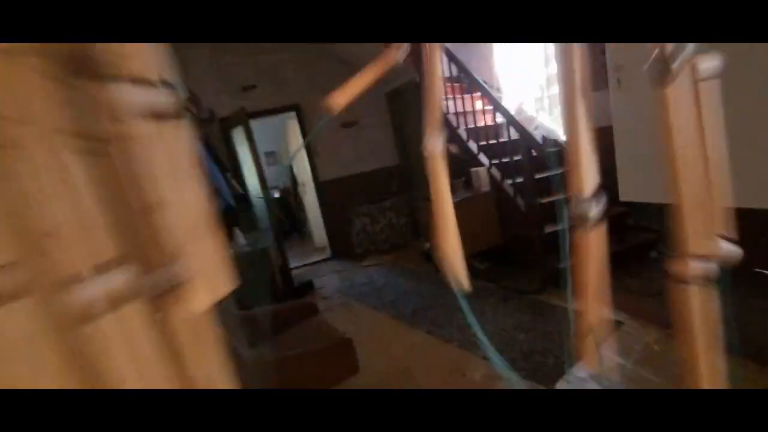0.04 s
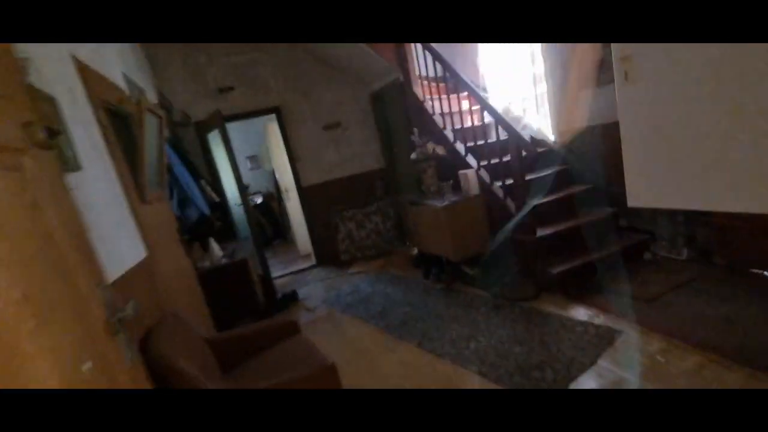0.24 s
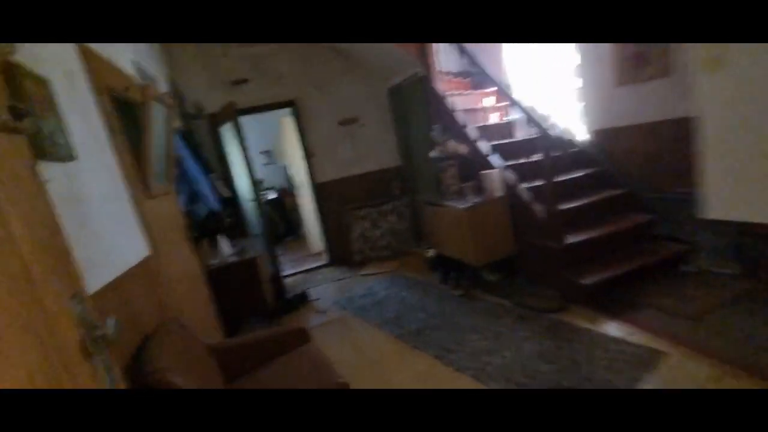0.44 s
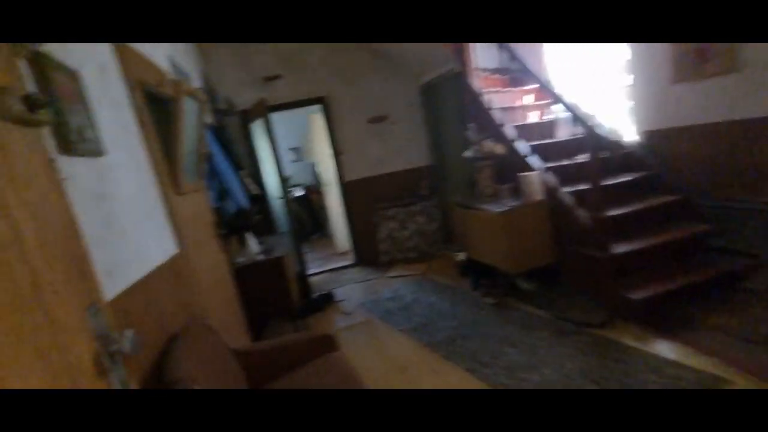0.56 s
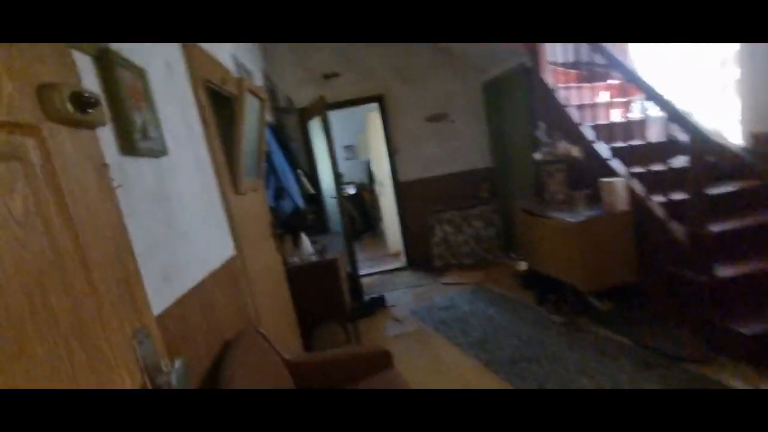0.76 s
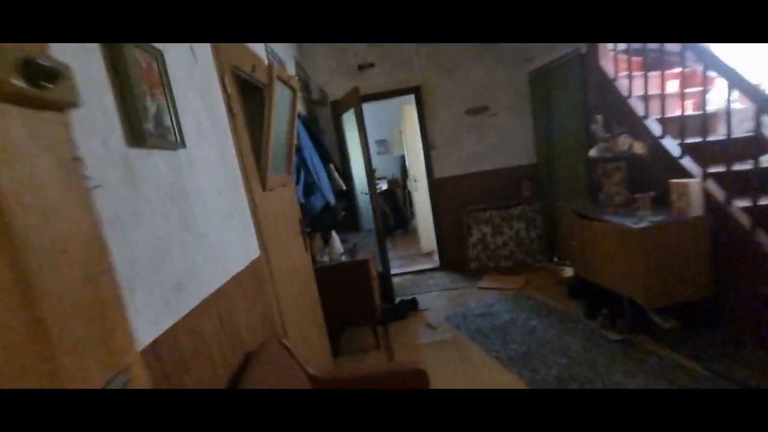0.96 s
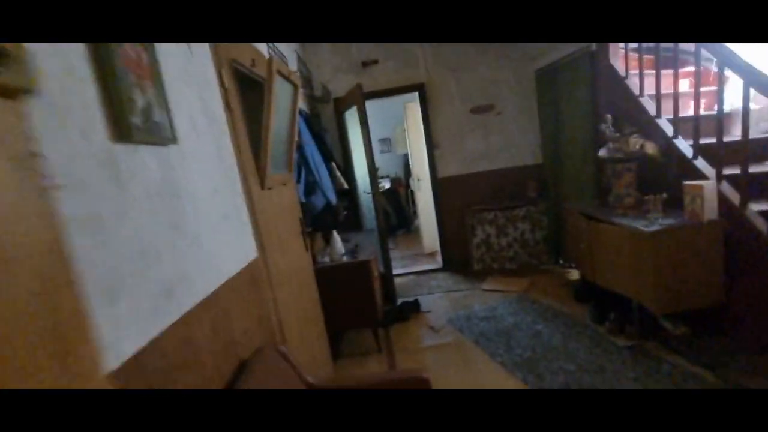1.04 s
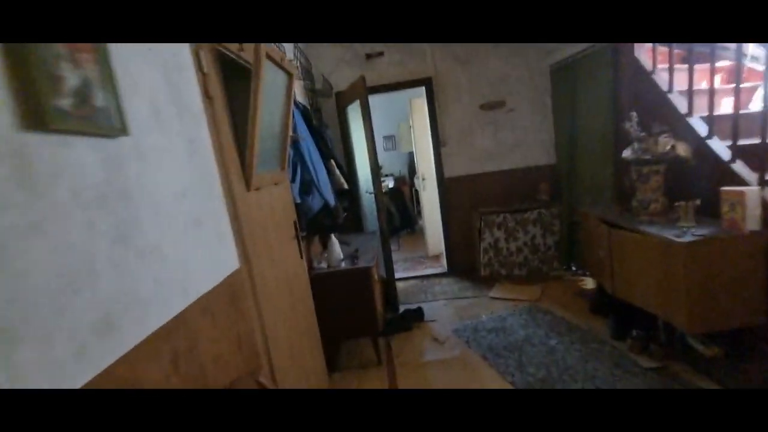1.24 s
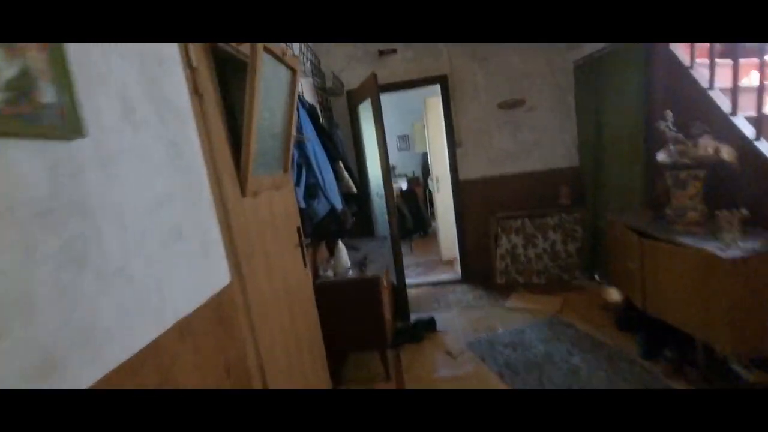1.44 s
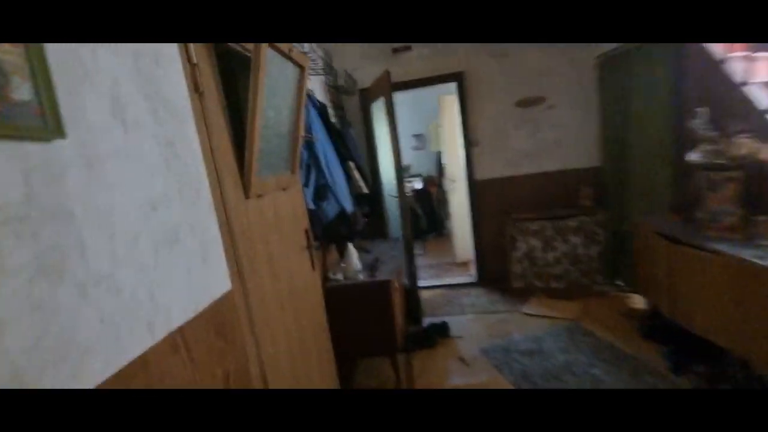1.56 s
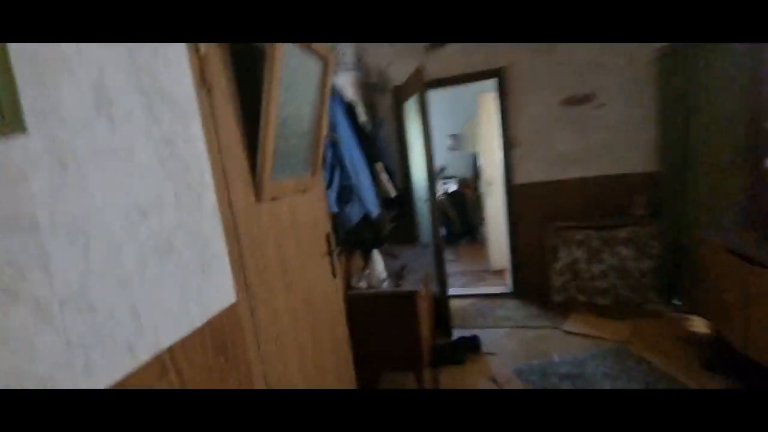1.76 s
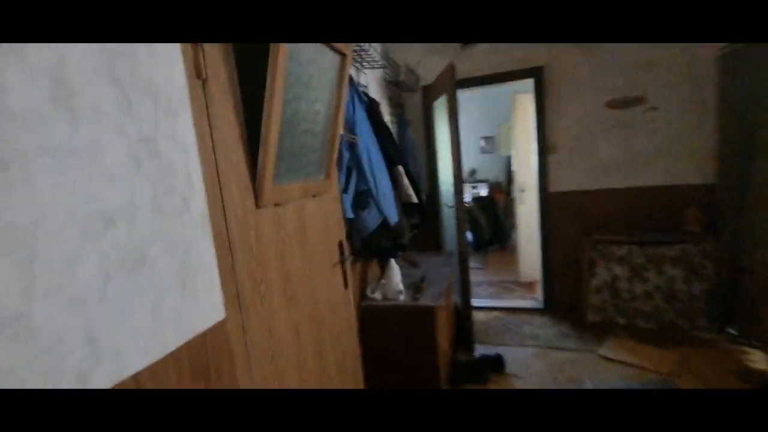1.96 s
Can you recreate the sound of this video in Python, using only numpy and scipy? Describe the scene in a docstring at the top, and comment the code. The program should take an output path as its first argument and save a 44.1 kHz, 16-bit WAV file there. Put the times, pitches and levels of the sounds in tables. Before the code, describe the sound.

Strands of wooden beads bump right on the microphone, close and dry, before ticking and rustling past as someone pushes through the curtain. Footsteps follow on a wooden floor, with a short echo from the empty hall.

```python
"""Wooden beads rattle and bump right at the microphone: a camera is carried through a bead curtain.
The strands knock on its casing, click against each other and slide off in a rustle with tiny squeaks.
Below, footsteps thud on the wooden floor of an empty house and knock its boards.
The beads are close and almost dry; the steps come with the answer of the bare hall."""
import sys
import numpy as np
from scipy import signal
from scipy.fft import rfft, irfft, next_fast_len
from scipy.io import wavfile

SR = 44100
rng = np.random.default_rng(int(sys.argv[2]) if len(sys.argv) > 2 else 0)


def transcribe(u):
    """Save the signal u as a 16-bit wav file named by the first command-line argument.

    u: samples, shape (n,) or (channels, n), limited to [-1, 1]; the rate is SR.
    q: integer samples, one column per channel.
    """
    v = np.clip(np.atleast_2d(u).T, -1, 1)
    q = np.round(v * 32767).astype(np.int16)
    wavfile.write(sys.argv[1], SR, q)


N = 88200
TOP_HZ = 16000


def amp(db):
    """Decibels to gain."""
    return 10 ** (np.asarray(db) / 20)


def unit(x):
    """Scale to rms 1."""
    return x / np.sqrt(np.mean(x ** 2) + 1e-20)


def along(points, hz):
    """Read a curve of (hz, value) points on a log frequency axis."""
    point_hz, values = np.transpose(points)
    return np.interp(np.log(hz + 1), np.log(point_hz + 1), values)


def colour(x, points):
    """Minimum-phase filter shaped by (hz, db) points."""
    n = x.shape[-1]
    size = 2 * next_fast_len(n // 2 + 2048)
    gain = amp(along(points, np.fft.rfftfreq(size, 1 / SR)))
    cepstrum = irfft(np.log(gain))
    cepstrum[1:size // 2] *= 2
    cepstrum[size // 2 + 1:] = 0
    return irfft(rfft(x, size) * np.exp(rfft(cepstrum)), size)[..., :n]


def soften(x, hz, order):
    """Low-pass: a soft contact passes less treble."""
    return signal.sosfilt(signal.butter(order, hz, fs=SR, output="sos"), x)


def add(track, start_s, x, pan_db=0):
    """Mix a sound in; pan_db is left over right."""
    part = track[:, max(round(start_s * SR), 0):][:, :x.shape[-1]]
    part += (x * amp([[pan_db / 2], [-pan_db / 2]]))[:, :part.shape[1]]


def ring(modes, wave=np.sin, ratio=1):
    """Damped modes, the k-th weighted by ratio ** k; a negative ratio opposes neighbours."""
    t = np.arange(SR // 2) / SR
    return sum(ratio ** k * amp(db - 60 * t / t60_s) * wave(2 * np.pi * hz * t)
               for k, (hz, db, t60_s) in enumerate(modes))


def strike(x):
    """Scale each channel to the energy of 4 ms at rms 1."""
    return x / np.linalg.norm(x, axis=-1, keepdims=True) * np.sqrt(.004 * SR)


# room tone, all around: freq_hz, gain_db
ROOM_TONE = [(25, -0.5), (65, 9), (140, -11), (330, -5), (1500, -15), (15000, -78)]


def room_tone(level_db=-48):
    """The quiet, low background of the house, partly shared by both microphone ports."""
    noise = rng.standard_normal(N) + rng.standard_normal((2, N))
    return amp(level_db) * unit(colour(noise, ROOM_TONE))


# decay of the bare hall: freq_hz, t60_s
HALL_DECAY = [(100, 0.46), (350, 0.45), (900, 0.43), (10000, 0.29)]


def hall(x, wet_db, build_s=0.0076):
    """Direct sound plus the reflections of the hall, whose treble dies first."""
    hz, t, spectrum = signal.stft(rng.standard_normal((2, SR * 2 // 3)), SR, nperseg=256)
    decay = amp(-60 * t / along(HALL_DECAY, hz)[:, None])
    tail = signal.istft(spectrum * decay, SR, nperseg=256)[1]
    tail *= 1 - np.exp(-(np.arange(tail.shape[1]) / SR / build_s) ** 2)
    tail /= np.linalg.norm(tail[0])
    return x + amp(wet_db) * signal.fftconvolve(x, tail, axes=1)[:, :N]


# heels landing below the camera: start_s, level_db
FOOTFALLS = [(0.678, -34.5), (1.02, -13.5), (1.784, -31.5)]
# modes of the wooden floor: pitch_hz, level_db, t60_s
FLOOR_MODES = [(77.9, -5, 0.28), (104.9, -1, 0.18), (164.6, -14.5, 0.22), (253, -5.5, 0.046),
               (595, -1.5, 0.02)]


def heel_thuds(rise_s=0.003):
    """Each footfall sets the wooden floor booming."""
    out = np.zeros((2, N))
    boom = ring(FLOOR_MODES)
    boom *= 1 - np.exp(-np.arange(len(boom)) / SR / rise_s)
    for start_s, level_db in FOOTFALLS:
        add(out, start_s, amp(level_db) * boom / np.abs(boom).max())
    return hall(out, wet_db=-5)


# boards underfoot: start_s, level_db, cutoff_hz, length_s, ring_db, clack_hz
BOARD_KNOCKS = [(1.2024, -13, 3700, 0.037, -6.5, 512), (1.7795, -31, 2070, 0.015, -27, 1123),
                (1.8234, -38, 5840, 0.015, -18, 1470)]
# tone of a board's crack: freq_hz, gain_db
CRACK_TONE = [(60, -10), (150, -14), (270, 6.5), (540, -2.5), (850, 1.5), (1200, 3.5), (1900, -4.5),
              (4000, -12.5), (6000, -21), (15000, -0.5)]
# after-ring of a board: pitch_hz, level_db, t60_s
BOARD_RING = [(266.1, 8.5, 0.2), (355.7, -7, 0.41), (448.5, -18, 0.3), (1136, 7.5, 0.15)]


def board_knocks(rise_s=0.00038, clack_db=-1):
    """Loose boards clack, each at its own pitch, and ring as the weight rolls onto them."""
    out = np.zeros((2, N))
    t = np.arange(SR // 2) / SR
    for start_s, level_db, cutoff_hz, length_s, ring_db, clack_hz in BOARD_KNOCKS:
        envelope = amp(-60 * t / length_s) * (1 - np.exp(-t / rise_s)) ** 2
        contact = rng.standard_normal((2, len(t))) * envelope
        crack = strike(soften(colour(contact, CRACK_TONE), cutoff_hz, order=2))
        clack = amp(clack_db) * strike(ring([(clack_hz, 0, 1.2 * length_s)]))  # outlasts the contact
        after_ring = amp(ring_db) * strike(ring(BOARD_RING))
        add(out, start_s, amp(level_db) * (crack + clack + after_ring))
    return hall(out, wet_db=-0.5)


# strands and clothes sliding close to the microphone: time_s, hiss_db, rasp_db
SLIDING = [(0, -50, -52.5), (0.097, -66.5, -58.5), (0.196, -46, -36), (.27, -77, -49), (.38, -60.5, -60),
           (.42, -43.5, -57.5), (0.524, -46, -46), (0.56, -37.5, -40), (0.689, -40.5, -40.5),
           (0.716, -31, -33), (0.824, -46.5, -46), (1.03, -53.5, -47.5), (1.07, -46.5, -42),
           (1.202, -41.5, -46), (1.33, -55.5, -49.5), (1.5, -54, -52.5), (1.514, -48.5, -39),
           (1.589, -48, -49.5), (1.77, -46, -47), (1.87, -54.5, -44.5), (2, -49.5, -50)]
# their high hiss and woody rasp: freq_hz, gain_db
HISS_TONE = [(1500, -20), (4000, 4), (7500, 0), (9700, 7.5), (11500, -1), (15500, -9)]
RASP_TONE = [(200, -64), (700, 3.5), (1400, 9.5), (2500, 15), (4000, 11), (7000, 0.5), (15000, -125)]


def rustle(grains_per_s=600, grain_s=.0015, spread_db=4.2, steady_db=-6):
    """Countless tiny contacts of sliding strands and cloth roughen a hiss and a rasp."""
    t = np.arange(N) / SR
    contacts = (rng.random(N) < grains_per_s / SR) * amp(spread_db * rng.standard_normal(N))
    energy = signal.lfilter([1], [1, -np.exp(-1 / (grain_s * SR))], contacts ** 2)
    grains = unit(np.sqrt(energy)) + amp(steady_db)
    times, hiss_db, rasp_db = np.transpose(SLIDING)
    out = np.zeros((2, N))
    for level_db, tone in [(hiss_db, HISS_TONE), (rasp_db, RASP_TONE)]:
        friction = unit(colour(grains * rng.standard_normal((2, N)), tone))
        out += amp(np.interp(t, times, level_db)) * friction
    return out


def squeaks(per_s=40, length_s=.028, pitch_hz=10000, spread=.085, width_hz=240):
    """Sliding surfaces stick and slip in tiny gliding chirps that follow the level of the hiss."""
    out = np.zeros((2, N))
    times, hiss_db, _ = np.transpose(SLIDING)
    progress = np.linspace(0, 1, int(length_s * SR))
    envelope = 2 * np.sin(np.pi * progress) ** 2
    for slot_s in np.arange(0, N / SR, 1 / per_s):
        delay, pitch, glide, size, pan = rng.standard_normal(5)
        hz = pitch_hz * np.exp(spread * (pitch + glide * (progress - .5)))
        jitter = rng.standard_normal((2, len(progress))) * np.sqrt(2 * np.pi * width_hz / SR)
        chirp = envelope * np.sin(np.cumsum(2 * np.pi * hz / SR + jitter, axis=1))
        start_s = slot_s + delay / per_s / 2
        level_db = np.interp(start_s + length_s / 2, times, hiss_db) - 2 + 2 * size
        add(out, start_s, amp(level_db) * chirp, pan_db=2 * pan)
    return out


# sharp ticks near the microphone, mostly beads, and one duller wooden tick:
# peak_s, level_db, length_s, pan_db, treble_db, pitch_hz
TICKS = [(0.079, -37, 0.029, -4, -38, 3240), (0.1433, -31, 0.025, -3, -27, 11200),
         (0.1843, -26, 0.0083, -3, -19, 11400), (0.2047, -32, .009, -10, -32, 10700),
         (0.2453, -13, 0.012, -8.5, 2, 9900), (0.429, -35.5, 0.004, 5, 34, 9100),
         (.493, -31.5, 0.015, 2.5, -22.5, 6800), (.553, -26, 0.025, 0, 4, 7940),
         (0.566, -24.5, 0.031, 2.5, 17, 8300), (0.575, -30.5, 0.0056, -7, 5, 10200),
         (0.606, -26.5, 0.034, 2, -11, 9400), (.625, -23, 0.038, 0, 3, 10700),
         (0.6497, -29, 0.024, 1, -7, 9500), (0.668, -30.5, 0.015, -12, -9, 9900),
         (0.71, -25, 0.0099, -0.5, -7.5, 9400), (0.716, -22.5, 0.0049, 0.5, 25, 10700),
         (0.8564, -33, 0.003, 1, -6, 8900), (.914, -35.5, 0.024, 4.5, -9, 8700),
         (1.061, -29.5, 0.0055, 4.5, -27, 1170), (1.197, -26, 0.069, 3.5, -37, 8660),
         (1.515, -35, 0.021, 0, -12, 3020)]
# tone common to all ticks: freq_hz, gain_db
TICK_TONE = [(500, -16), (1200, -11), (2300, -6), (5000, 2), (8000, 0.5), (12500, 0), (15500, -11.5)]
# faint, narrow high shimmer after each tick: pitch_hz, level_db, t60_s
HIGH_SHIMMER = [(9660, -21, 0.2)]


def ticks(rise_share=.35, resonance_db=10, relative_width=.08, shimmer_width_hz=260):
    """Brief contacts, mostly beads grazing each other, swell to a tick; each has its own resonance."""
    out = np.zeros((2, N))
    t = np.arange(-SR // 40, SR // 20) / SR
    hz = np.geomspace(500, TOP_HZ, 200)
    for peak_s, level_db, length_s, pan_db, treble_db, pitch_hz in TICKS:
        tilt = treble_db * np.clip(np.log10(hz / 1000), 0, 1)
        resonance = resonance_db / (1 + (np.log(hz / pitch_hz) / relative_width) ** 2)
        tone = np.transpose([hz, along(TICK_TONE, hz) + tilt + resonance])
        envelope = amp(-60 * np.maximum(t, -t / rise_share) / length_s)
        contact = rng.standard_normal((2, len(t))) * envelope
        add(out, peak_s + t[0], amp(level_db) * strike(colour(contact, tone)), pan_db)
        flicker = unit(soften(rng.standard_normal((2, SR // 2)), shimmer_width_hz, order=2))
        add(out, peak_s, amp(level_db) * flicker * ring(HIGH_SHIMMER), pan_db)
    return hall(out, wet_db=-28)


# beads striking the camera itself: start_s, level_db, cutoff_hz, pan_db
CAMERA_BUMPS = [(0.12, -18, 810, -4), (0.1533, -2.5, 433, 0.5), (0.176, -0.5, 563, -7.5),
                (.183, -15, 334, 5), (0.214, -22.5, 130, -4), (0.235, -18.5, 600, -6),
                (0.3117, 5.5, 4070, -3.5), (0.677, -18.5, 246, 2.5)]
# the camera's body (first row), then its casing: pitch_hz, unweighted_db, t60_s
CAMERA_MODES = [(82.4, -0.5, 0.05), (383.4, 13, 0.032), (757, 13, 0.0093), (1620, 9, 0.011),
                (2487, 5, 0.0093), (3680, 3.5, 0.012), (6240, 5.5, 0.0048)]
# hollow after-ring of a strand: pitch_hz, level_db, t60_s
STRAND_MODES = [(250.4, -35.5, 0.21), (283, -39, 0.4), (333, -26.5, 0.082)]


def camera_bumps(left_lag_s=0.000227, full_ring_hz=2420):
    """Beads hit the camera: its body thumps, its casing rings with opposite signs at the two ports."""
    out = np.zeros((2, N))
    body = ring(CAMERA_MODES[:1], np.cos)
    casing = ring(CAMERA_MODES[1:], np.cos, ratio=-1.304)
    t = np.arange(len(body)) / SR
    late_casing = np.interp(t - left_lag_s, t, casing, left=0)
    ports = np.array([body + late_casing, body - casing])
    for start_s, level_db, cutoff_hz, pan_db in CAMERA_BUMPS:
        thump = soften(ports, cutoff_hz, order=3)
        strand = min(cutoff_hz / full_ring_hz, 1) * ring(STRAND_MODES)  # soft blows ring it less
        add(out, start_s, amp(level_db) * (thump / np.abs(thump).max() + strand), pan_db)
    return hall(out, wet_db=-28)


def scene():
    """The curtain at the microphone, the steps below it, the house around."""
    close = camera_bumps() + ticks() + rustle() + squeaks()
    return close + heel_thuds() + board_knocks() + room_tone()


# colour of the microphone's right port over its left: freq_hz, gain_db
PORT_BALANCE = [(1000, 0), (2200, -4.5), (4500, 1.5), (9000, -5.5), (11000, 3.5), (14000, 9.5)]


def record(dry, low_cut_hz=45):
    """The camera's stereo microphone: bass cut, unequal ports, overload at full scale, band limit."""
    hz = np.fft.rfftfreq(2 * N, 1 / SR)
    tilt_db = along(PORT_BALANCE, hz) / 2
    x = signal.sosfilt(signal.butter(2, low_cut_hz, "high", fs=SR, output="sos"), dry)
    x = irfft(rfft(x, 2 * N) * amp([-tilt_db, tilt_db]))[:, :N]
    x = np.clip(x, -1, 1)
    return irfft(rfft(x, 2 * N) * (hz < TOP_HZ))[:, :N]


dry = scene()
out = record(dry)
transcribe(out)
```